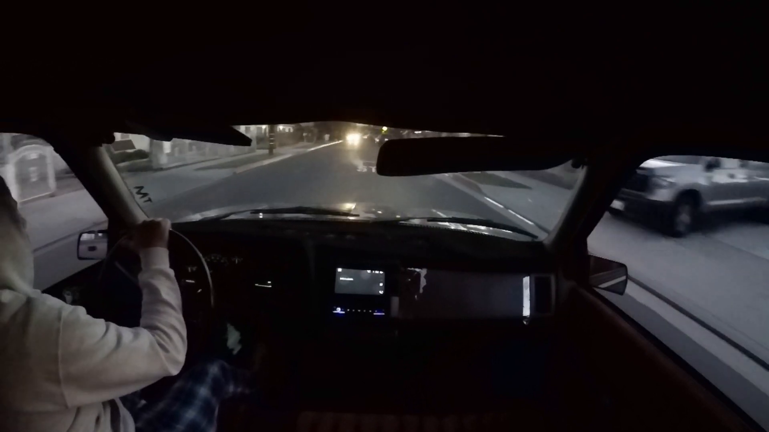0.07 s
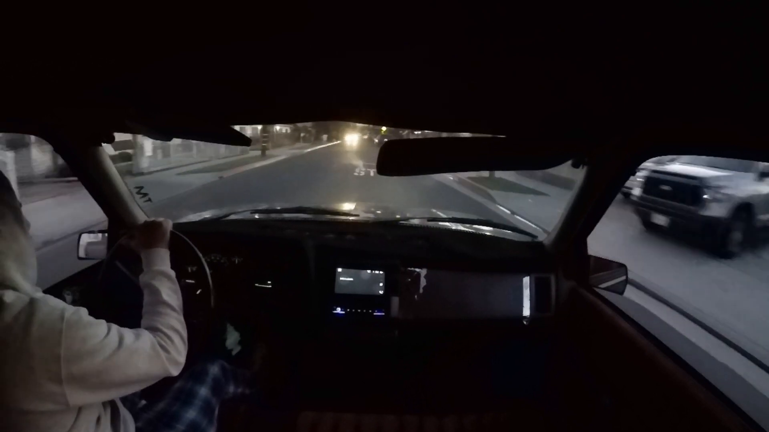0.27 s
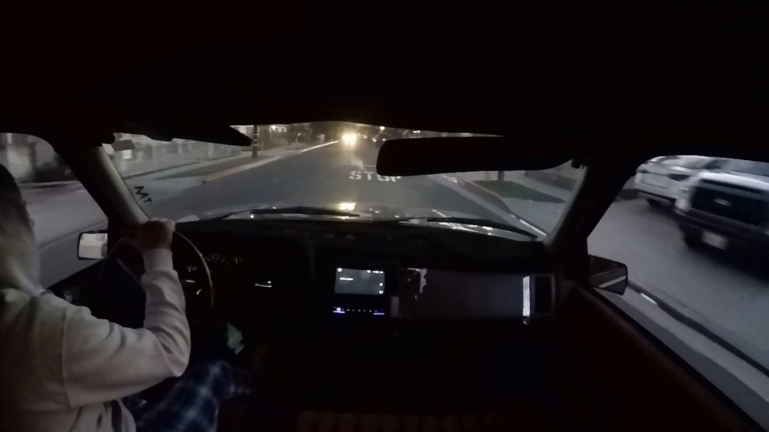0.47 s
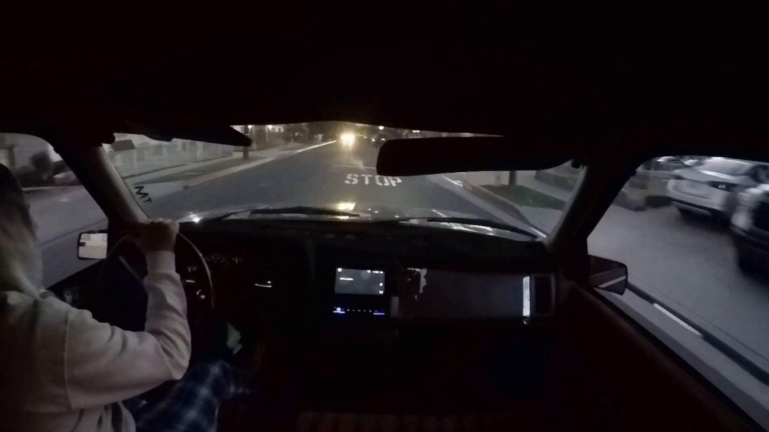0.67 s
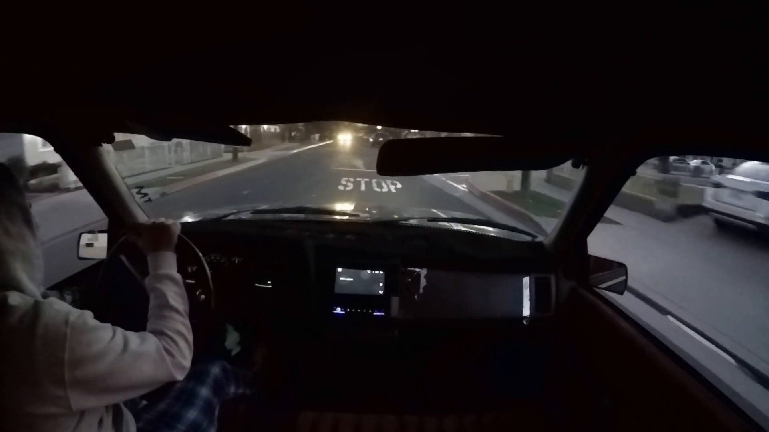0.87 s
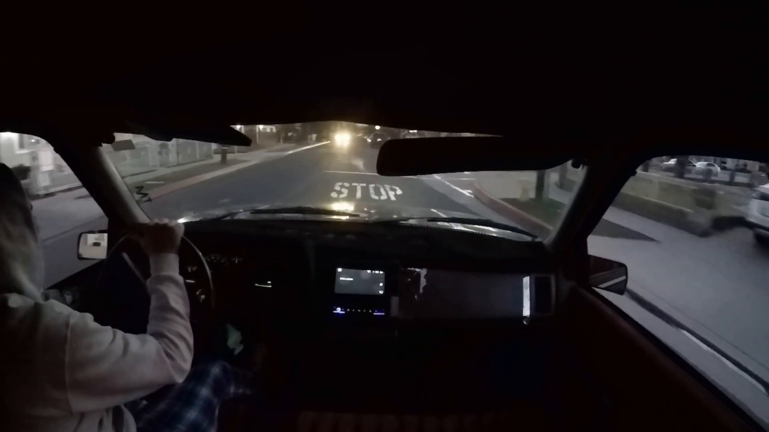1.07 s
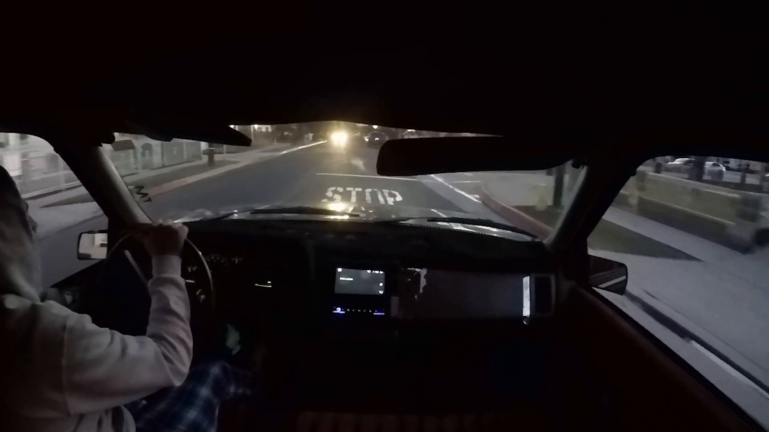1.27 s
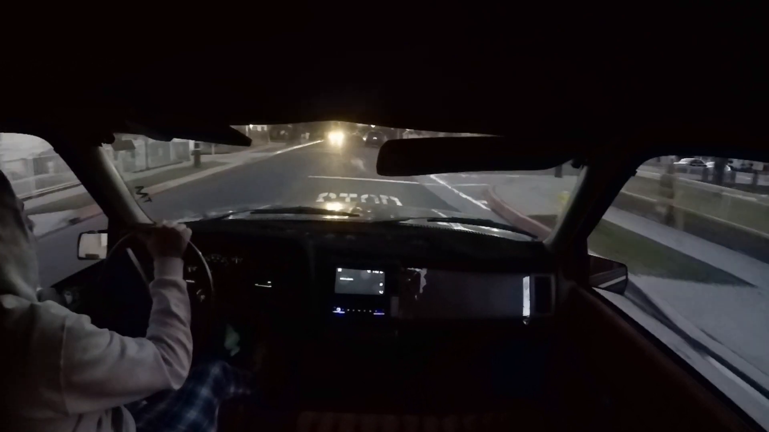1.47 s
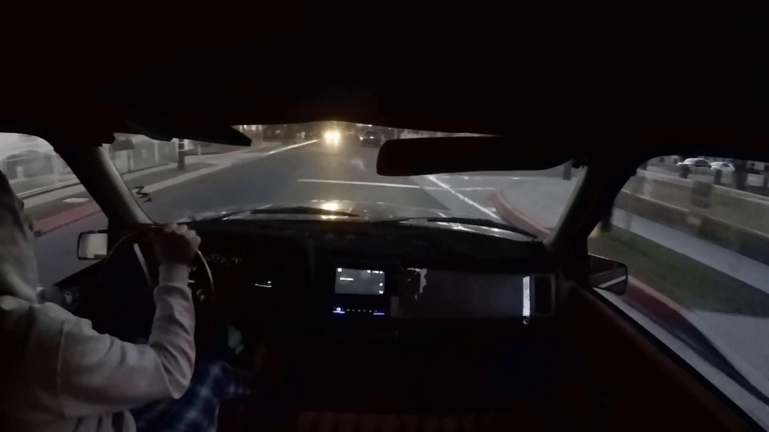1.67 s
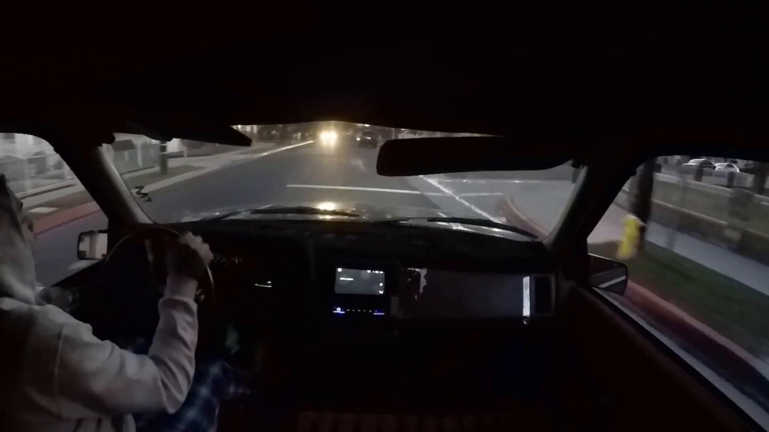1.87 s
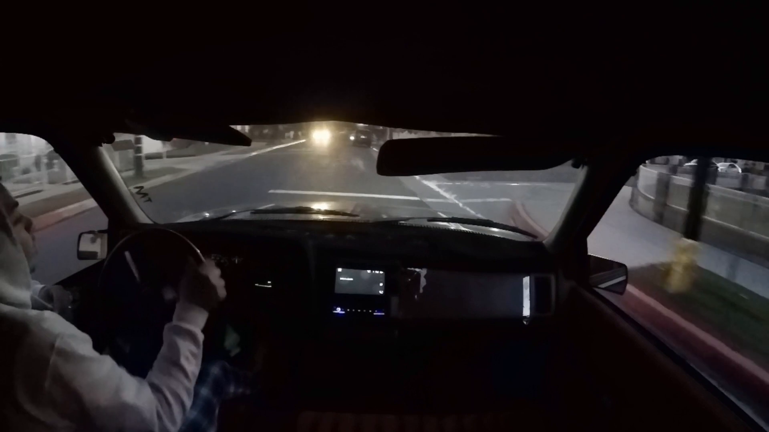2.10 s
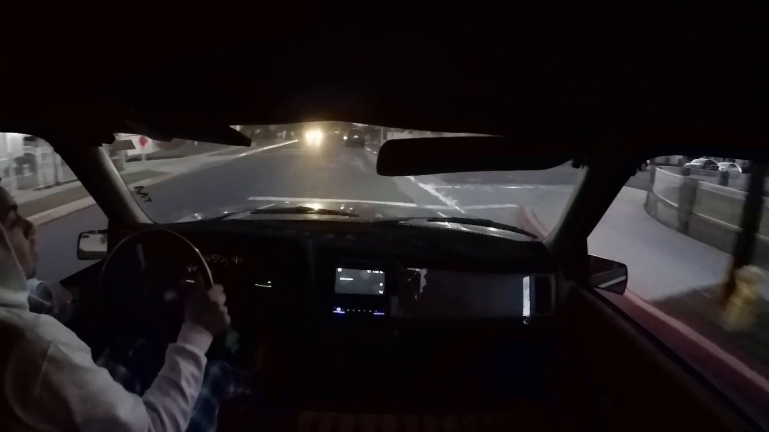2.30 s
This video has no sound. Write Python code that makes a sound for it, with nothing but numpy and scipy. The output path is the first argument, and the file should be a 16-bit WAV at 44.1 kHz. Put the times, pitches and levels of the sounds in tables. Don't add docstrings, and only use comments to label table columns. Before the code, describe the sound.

Inside a moving truck cab, a deep engine drone sinks as it coasts, growls briefly higher and rougher, then settles; muffled road drumming swells and fades beneath, with a small stalk click and faint hand rub late.

```python
import sys
import numpy as np
from scipy import signal
from scipy.io import wavfile
from scipy.ndimage import uniform_filter1d

SR = 44100
rng = np.random.default_rng(int(sys.argv[2]) if len(sys.argv) > 2 else 0)


def waveform_to_disk(signal):
    frames = np.transpose(np.atleast_2d(signal))
    scaled = np.clip(frames, -1, 1) * 32767
    samples = np.round(scaled).astype(np.int16)
    wavfile.write(sys.argv[1], SR, samples)


def to_linear_factor(level_db):
    exponent = np.asarray(level_db, float) / 20
    return 10 ** exponent


N = 103105
TIME = np.arange(N) / SR


def evened(x):
    return x / np.sqrt(np.mean(x ** 2) + 1e-20)


def curve(table, axis):
    rows = np.array(table)
    return np.interp(TIME, rows[:, 0], rows[:, axis])


def drift(count, rate_hz):
    t = np.arange(0, N, 100) / SR
    f = np.geomspace(.3, 1, 8) * rate_hz
    slow = np.sin(2 * np.pi * (f[:, None] * t + rng.random((count, 8, 1)))).sum(1) / 2
    return np.array([np.interp(np.arange(N), t * SR, v) for v in slow])


def ring(x, hz, width):
    turn = np.exp(2j * np.pi * hz * np.arange(len(x)) / SR)
    r = np.exp(-np.pi * width / SR)
    smooth = signal.lfilter([(1 - r) ** 2], [1, -2 * r, r * r], x / turn)
    return 2 * (turn * smooth).real


def wash(spectrum):
    patch_db, flicker_db = .5, .5
    frames, hz = N // 256 + 5, np.fft.rfftfreq(1024, 1 / SR)
    a, b, patches = rng.standard_normal((frames, 513, 3)).T
    patches = uniform_filter1d(patches, size=12, axis=0)
    patches = evened(uniform_filter1d(patches, size=12, axis=1))
    flicker = evened(uniform_filter1d(rng.standard_normal(frames), size=4))
    f, db = np.transpose(spectrum)
    colour_db = np.interp(np.log(hz + 1), np.log(f + 1), db)[:, None]
    level_db = colour_db + patch_db * patches + flicker_db * flicker
    noise = signal.istft((a + 1j * b) * to_linear_factor(level_db), nperseg=1024, noverlap=768)[1]
    return evened(noise[:N])


ORDERS = np.array([3, 4, 5, 6, 7, 8, 9, 10, 11, 12, 13, 14, 15, 16, 17, 18, 19, 24, 25, 30, 35])
COAST_SIGN = np.array([1, -1, 1, -1, 1, 1, 1, 1, -1, 1, 1, 1, 1, 1, 1, 1, 1, 1, 1, -1, 1])
GAS_SIGN = np.array([1, -1, 1, 1, 1, -1, 1, -1, -1, 1, 1, 1, 1, 1, 1, 1, 1, 1, 1, -1, 1])
COAST_DB = [-45, -40, -21.5, -22.5, -30, -10, -40, -20.5, -29, -39, -39, -38, -33, -34, -45, -46, -46, -49,
            -46, -51, -48]
GAS_DB = [-50, -44, -44, -28, -29, -10.5, -32, -32, -25, -38, -33, -35, -20.5, -20.5, -37, -39, -37, -54,
          -54, -50, -54]


def firing_orders(cycles, gas, boom_db):
    order = np.array(ORDERS)
    wobble_db, wobble_rad, gas_rough = 1.1, .15, .2
    coast = (COAST_SIGN * to_linear_factor(COAST_DB))[:, None]
    coast = coast * to_linear_factor(wobble_db * drift(count=len(order), rate_hz=4.02))
    coast[order == 8] *= to_linear_factor(boom_db)
    coast[order == 5] *= to_linear_factor(-3 * (TIME - 2))
    coast[order > 16] *= to_linear_factor(-4 * (TIME - 1))
    roughness = 1 + gas_rough * drift(count=len(order), rate_hz=6.7)
    push = (GAS_SIGN * to_linear_factor(GAS_DB))[:, None] * gas * roughness

    low, high = 14, 17
    pipe_lag, tail_delay, tail_lag, gas_delay = .04, -.18, .61, -.2
    tail = (order >= low) & (order <= high)
    late = (tail * (order * tail_delay + tail_lag))[:, None]
    gas_late = (tail * (order - (low + high) / 2))[:, None] * gas_delay * np.minimum(gas, 1)
    phase = 2 * np.pi * (order[:, None] * cycles + pipe_lag + late + gas_late)
    phase += wobble_rad * drift(count=len(order), rate_hz=4.006)
    return np.sqrt(2) * ((coast + push) * np.cos(phase)).sum(0)


# f/Hz, width/Hz, coasting level/dB, throttle level/dB
CAB = [(29, 18, -36, -44), (57, 16, -30, -26), (68, 16, -32, -25), (95, 22, -32, -26), (140, 40, -32, -29)]


def uneven_burns(cycles, gas):
    fired = np.diff(np.floor(8 * cycles), prepend=0) > 0
    burns = fired * rng.standard_normal(N)
    out = np.zeros(N)
    for hz, width, coast_db, gas_db in CAB:
        out += evened(ring(burns, hz, width)) * (to_linear_factor(coast_db) + gas * to_linear_factor(gas_db))
    return out


# t/s, four-stroke cycle rate f/Hz
SPEED = [
    (0, 9.78),
    (.3, 9.41),
    (.6, 9.21),
    (.9, 9.04),
    (1.2, 8.88),
    (1.5, 8.46),
    (1.7, 8.42),
    (1.9, 8.55),
    (2.1, 8.69),
    (2.34, 8.55),
]
# t/s, throttle 0-1, firing-order boom level/dB
PEDAL = [(0, .3, -2), (.12, .15, -3), (.3, .08, -4), (.65, .02, .3), (1.05, 0, 1), (1.45, .02, -.5),
         (1.56, .25, -1), (1.68, .7, -1), (1.82, 1.1, -1.5), (1.95, 1, -4), (2.05, .5, -1),
         (2.13, .08, -.5), (2.34, .06, -.5)]


def engine():
    cycles = np.cumsum(curve(SPEED, axis=1)) / SR - .27
    gas = np.clip(curve(PEDAL, axis=1), 0, 2)
    return firing_orders(cycles, gas, curve(PEDAL, axis=2)) + uneven_burns(cycles, gas)


# f/Hz, level/dB per Hz
ROAD = [(100, -50.5), (260, -9.5), (450, -1), (700, -4.5), (900, -7), (1530, -18.5), (3000, -30.5),
        (7000, -90.5)]
# f/Hz, level/dB per Hz
AIR = [(1470, -32), (2500, 0), (4040, -2), (5830, -3), (6900, -11), (9080, -5.5), (10800, -11),
       (12800, -21), (15600, -24)]
# f/Hz, level/dB per Hz
FLOOR = [(90, -60), (170, -2.5), (200, -1.5), (230, -.5), (260, -3.5), (320, -2), (400, -14), (1500, -89.5)]
# t/s, road level/dB, air level/dB, floor pan level/dB
OUTSIDE = [
    (0, -42, -62.5, -36.5),
    (.15, -42.5, -64.5, -40.5),
    (.62, -39.5, -62, -38),
    (.92, -43, -66.5, -41.5),
    (1.4, -46.5, -69, -46.5),
    (1.65, -44.5, -68, -42),
    (1.95, -43, -64, -41),
    (2.15, -39, -62.5, -38),
    (2.34, -40, -61, -43.5),
]


def outside():
    tyres = wash(ROAD) * to_linear_factor(curve(OUTSIDE, axis=1))
    hiss = wash(AIR) * to_linear_factor(5 + curve(OUTSIDE, axis=2))
    floor = wash(FLOOR) * to_linear_factor(curve(OUTSIDE, axis=3))
    return tyres + hiss + floor


# t/s, peak level/dB
TICKS = [
    (1.03, -62),
    (1.6794, -54),
    (2.0121, -35.5),
]
# f/Hz, level/dB, t60/s
TICK_MODES = [(3700, -2, .012), (4200, -3, .008), (4700, -3, .008), (5600, -3, .007), (6500, -2, .008),
              (10600, -10, .01), (2700, -6, .008)]


def stalk_ticks():
    out, t = np.zeros(N), np.arange(2000) / SR
    attack = np.minimum(t / .001, 1)
    for start, peak_db in TICKS:
        tick = np.zeros(len(t))
        for hz, db, t60 in TICK_MODES:
            tick += to_linear_factor(db - 60 * t / t60) * np.sin(2 * np.pi * (hz * t + rng.random()))
        out[round(start * SR):][:2000] += to_linear_factor(peak_db - 2.5) * attack * tick
    return out


# f/Hz, width/Hz, level/dB
SKIN = [(3950, 900, 0), (5500, 900, -9), (3000, 900, -12)]
SLIDE = (2.07, 2.12, 2.225, 2.28)


def palm_slide():
    rub = rng.standard_normal(N) * to_linear_factor(1.3 * drift(count=1, rate_hz=40)[0])
    skin = evened(sum(to_linear_factor(db) * evened(ring(rub, hz, width)) for hz, width, db in SKIN))
    return skin * to_linear_factor(-54) * np.interp(TIME, SLIDE, [0, 1, 1, 0])


def scene():
    return (engine() + outside() + stalk_ticks() + palm_slide())[None]


def band_limit(x):
    return signal.sosfilt(signal.butter(12, 15690, fs=SR, output="sos"), x)


def record(dry):
    knee = .6
    power = 2 * uniform_filter1d(uniform_filter1d(dry ** 2, size=310), size=400)
    held = dry / (1 + (power / knee ** 2) ** 3) ** (1 / 6)
    return band_limit(held)


dry = scene()
out = record(dry)
waveform_to_disk(out)
```